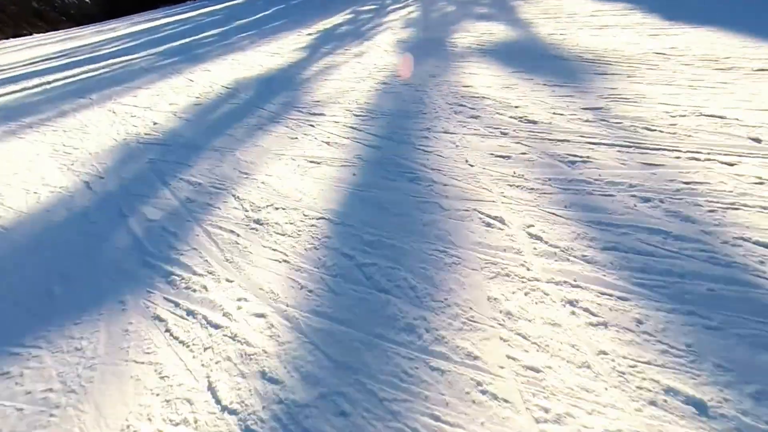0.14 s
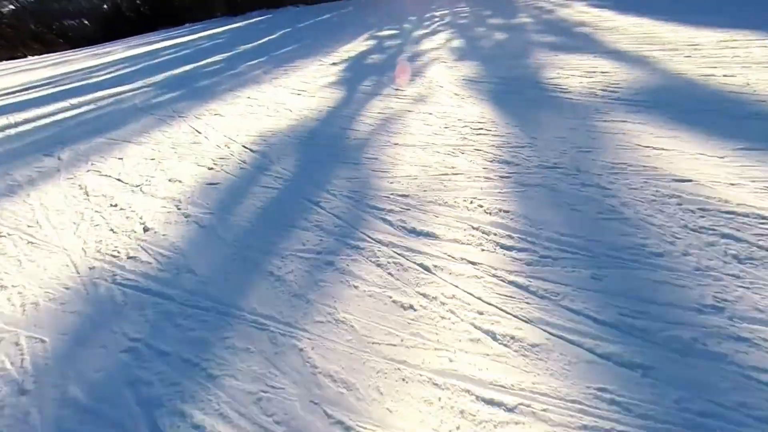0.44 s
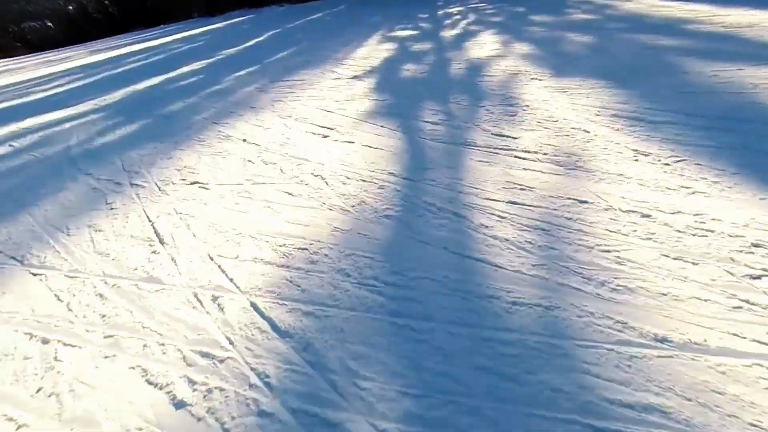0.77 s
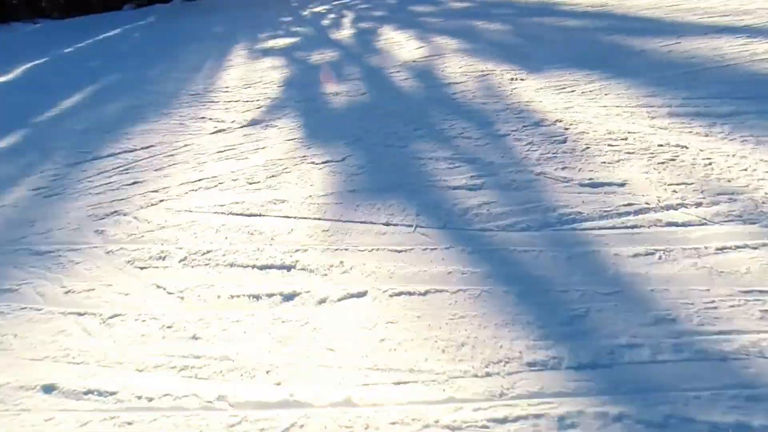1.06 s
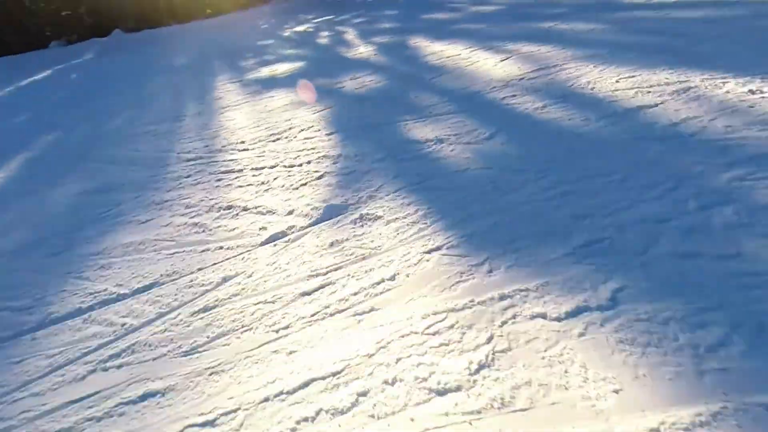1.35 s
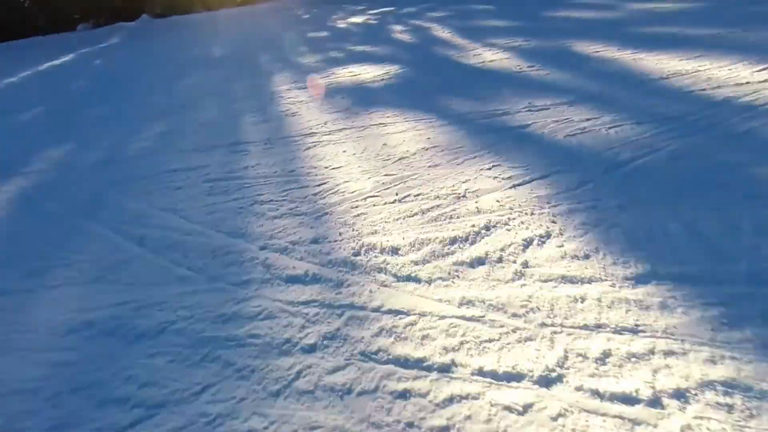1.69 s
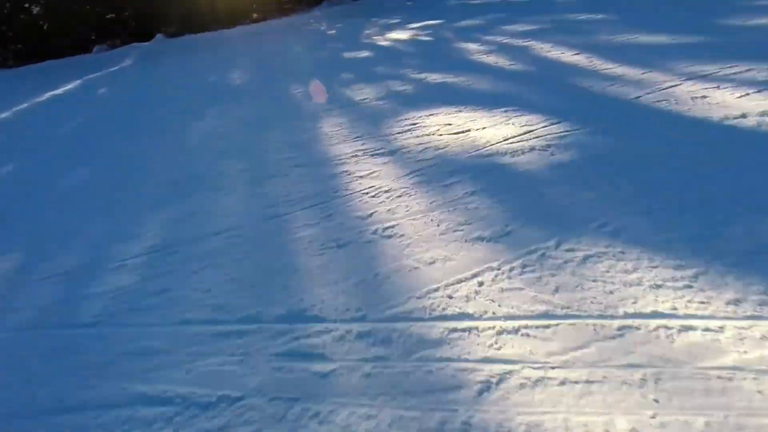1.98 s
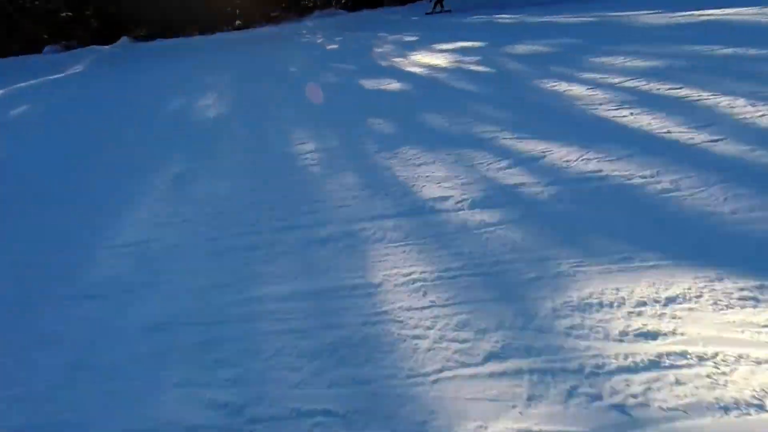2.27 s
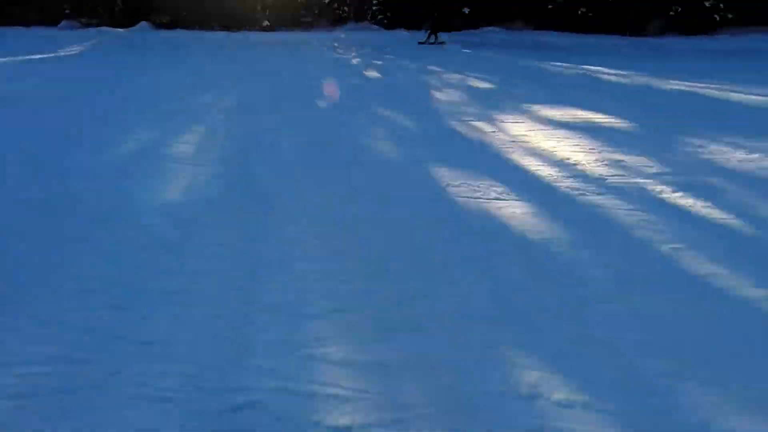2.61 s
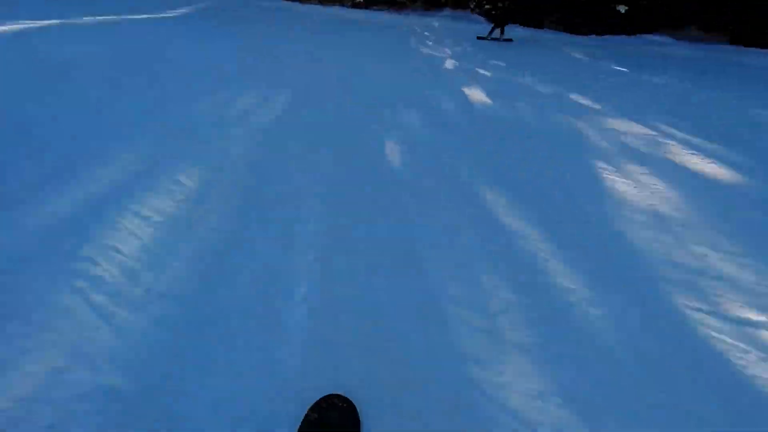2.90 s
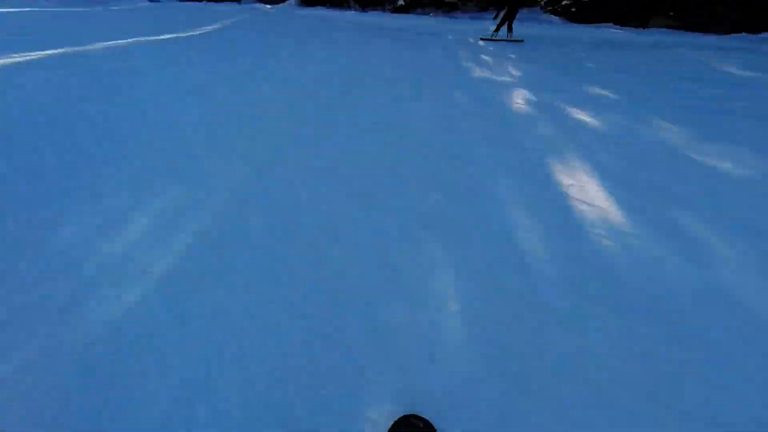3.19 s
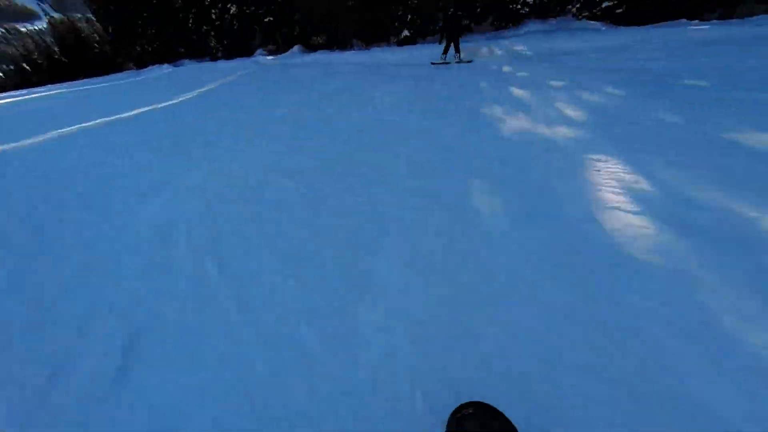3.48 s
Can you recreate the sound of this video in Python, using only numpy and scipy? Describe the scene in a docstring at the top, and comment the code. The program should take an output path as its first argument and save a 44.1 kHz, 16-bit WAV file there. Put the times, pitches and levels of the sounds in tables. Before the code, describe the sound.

A snowboard slides over packed snow with a steady hiss and low rumble, as wind buffets the rider's microphone. Small ticks hit the camera case, then the edge digs in and skids with one loud crack.

```python
"""A snowboard glides over packed snow, heard from a camera in a plastic case carried by the rider.
From the start the base hisses on the snow, the board rumbles and wind shakes the camera.
Soon small hard ticks, probably ice crumbs, ring the case near 2 kHz, and the board knocks on lumps.
Around 2 s the steel edge brushes the snow twice. Just after 3 s it digs in, and from 3.4 s it skids
to the end; early in the skid one tick is a loud crack."""
import sys
import numpy as np
from scipy import signal
from scipy.fft import rfft, irfft
from scipy.io import wavfile
from scipy.ndimage import uniform_filter1d

SR = 44100
rng = np.random.default_rng(int(sys.argv[2]) if len(sys.argv) > 2 else 0)


def transcribe(u):
    """Save the signal u as a 16-bit wav file named by the first command-line argument.

    u: samples, shape (n,) or (channels, n), limited to [-1, 1]; the rate is SR.
    q: integer samples, one column per channel.
    """
    v = np.clip(np.atleast_2d(u).T, -1, 1)
    q = np.round(v * 32767).astype(np.int16)
    wavfile.write(sys.argv[1], SR, q)


N = 160965
T = np.arange(N) / SR


def amp(db):
    """Turns decibels into a number to multiply by."""
    return 10 ** (np.asarray(db) / 20)


def unit(x):
    """Scales a signal to an average power of 1."""
    return x / np.sqrt(np.mean(x ** 2) + 1e-20)


def curve(rows, column=1):
    """Joins a table's points with straight lines, giving a value for every sample."""
    rows = np.array(rows)
    return np.interp(T, rows[:, 0], rows[:, column])


def spectrum(tone, hz):
    """Reads a tone table: how many dB at each frequency."""
    table_hz, db = np.transpose(tone)
    return np.interp(np.log(hz + 1), np.log(table_hz), db)


def add(mix, start_s, sound):
    """Mixes a sound in at its start time."""
    part = mix[round(start_s * SR):][:len(sound)]
    part += sound[:len(part)]


def noise(tone):
    """Steady noise shaped by a tone table."""
    gain = amp(spectrum(tone, np.fft.rfftfreq(N, 1 / SR)))
    return unit(irfft(rfft(rng.standard_normal(N)) * gain, N))


def uneven_snow(sound, patch_db, flicker_db):
    """Uneven snow makes a sound waver, in small patches of pitch and as a whole."""
    bands = signal.stft(sound, nperseg=256, noverlap=192)[2]
    patches = uniform_filter1d(rng.standard_normal(bands.shape), size=5, axis=0)
    patches = unit(uniform_filter1d(patches, size=24, axis=1))
    flicker = unit(uniform_filter1d(rng.standard_normal(bands.shape[1]), size=9))
    bands *= amp(patch_db * patches + flicker_db * flicker)
    return unit(signal.istft(bands, nperseg=256, noverlap=192)[1][:N])


# The tone of the plastic case when tapped (frequency [Hz], level [dB])
CASE_TONE = [(100, -24), (900, -27), (1200, -17), (1400, -18), (1520, -21), (1700, -3), (2000, 0),
             (2430, -1), (2700, -7.5), (3300, -13), (3700, -24), (5400, -26), (6400, -23), (6800, -15.5),
             (7600, -24), (8600, -21), (10000, -28), (11250, -19), (12600, -25), (13200, -34), (15200, -36)]
def case_ring(main_hz, treble_db, lag_s=.0004, lag_width_hz=1430):
    """A tap on the case: a snap, then a short ring whose pitch depends on where it is hit."""
    hz = np.fft.rfftfreq(4096, 1 / SR)
    shifted_hz = np.interp(hz, [0, main_hz, 11000, SR], [0, 2000, 11000, SR])
    db = spectrum(CASE_TONE, shifted_hz) + treble_db * np.maximum(hz - 3000, 0) / 9000
    log_gain = np.log(amp(np.r_[db, db[-2:0:-1]]))
    struck = np.exp(np.conj(signal.hilbert(log_gain)))[:len(hz)]  # starts sharply, then dies away
    lag = lag_s * np.exp(-((hz - main_hz) / lag_width_hz) ** 2)  # the ring comes after the snap
    wave = irfft(struck * np.exp(-2j * np.pi * np.cumsum(lag) * hz[1]))[:2048]
    return wave / abs(wave).max()


# The tone of the base sliding on snow (frequency [Hz], level [dB])
GLIDE_TONE = [(500, -24), (1000, -19.5), (1200, -14), (1450, -13.5), (1680, -3.5), (2000, 1), (2450, -3),
              (2650, -5.5), (2950, -7), (3150, -9), (3430, -10.5), (3800, -20), (4500, -23), (5030, -15),
              (5700, -24), (6900, -24), (7700, -26), (8500, -23), (9300, -29), (10300, -28.5),
              (11700, -35.5), (12300, -34.5), (13500, -43), (15200, -40)]
# How loud the glide's four ranges are, from low to high, before trim_db is added
# (time [s], hiss near 2 kHz [dB], rasp near 3 kHz [dB], sizzle near 5 kHz [dB], fine spray [dB])
GLIDE_LEVELS = [(0, -44, -52, -62.5, -67.5), (.12, -44.5, -49.5, -58.5, -66), (.4, -43.5, -51, -60.5, -68),
                (.6, -44.5, -51.5, -63, -71.5), (.79, -45.5, -51, -58, -67.5), (.9, -43, -50.5, -60, -66),
                (1.02, -45, -53, -59, -63), (1.1, -41.5, -47, -55.5, -60.5), (1.33, -42, -45, -54.5, -60),
                (1.48, -42, -50.5, -56.5, -63), (1.6, -46, -52, -57.5, -63),
                (1.76, -43.5, -47.5, -56.5, -62.5), (2.2, -44.5, -50, -56, -63.5),
                (2.48, -45.5, -52.5, -56.5, -65), (2.75, -41.5, -48, -56.5, -67.5),
                (2.88, -47.5, -53, -56, -67.5), (3.06, -47, -52.5, -57.5, -68),
                (3.3, -41, -43, -54.5, -64.5)]
# Where each range fades into the next (start [Hz], width [Hz])
RANGE_BORDERS = [(2250, 580), (3700, 300), (6000, 2040)]
def glide(trim_db, grains_per_s=400, grain_spread_db=2, grain_db=-10):
    """The base rubs over snow grains: a hiss with tiny clicks, swelling in four pitch ranges."""
    hits = (rng.random(N) < grains_per_s / SR) * rng.choice([-1, 1], N)
    strength = amp(grain_spread_db * np.minimum(rng.exponential(1, N), 4))
    grains = unit(signal.oaconvolve(hits * strength, case_ring(1950, treble_db=-10))[:N])
    rubbing = uneven_snow(noise(GLIDE_TONE), patch_db=1.14, flicker_db=0.98)
    whole = rfft(rubbing + amp(grain_db) * grains)
    hz = np.fft.rfftfreq(N, 1 / SR)
    above = [1] + [np.clip((hz - start) / width, 0, 1) for start, width in RANGE_BORDERS] + [0]
    out = np.zeros(N)
    for k in range(len(RANGE_BORDERS) + 1):
        band = unit(irfft(whole * (above[k] - above[k + 1]), N))
        out += band * amp(trim_db + curve(GLIDE_LEVELS, column=k + 1))
    return out


# The tone of the rumbling board (frequency [Hz], level [dB])
RUMBLE_TONE = [(25, -7), (60, -4.5), (78, -3.5), (115, 4), (160, -8), (220, -4), (320, -5), (420, -9.5),
               (520, -13), (670, -13.5), (850, -22), (1300, -23), (3000, -55)]
# How loud it rumbles (time [s], level [dB])
RUMBLE_LEVELS = [(0, -47.5), (.3, -49), (.58, -48.5), (.8, -49.5), (1.0, -47.5), (1.33, -47), (1.55, -48),
                 (1.8, -45.5), (2.1, -45.5), (2.39, -47), (2.67, -45), (3.05, -46), (3.27, -43.5),
                 (3.46, -40.5), (3.64, -47)]
# Dull knocks on lumps (time [s], level [dB], pitch [Hz], time to fade by 60 dB [s])
LUMP_KNOCKS = [(0.529, -36, 111, 0.079), (.905, -32.5, 80, .14), (1.314, -35, 327, 0.071),
               (1.351, -34, 84, 0.11), (2.685, -36.5, 284, 0.066), (2.859, -31.5, 109.4, 0.13),
               (3.2692, -21.5, 670, 0.024), (3.544, -22, 304, 0.047)]
def board():
    """The board rumbles over ridges in the snow and knocks on lumps."""
    out = uneven_snow(noise(RUMBLE_TONE), patch_db=1.0, flicker_db=1.07) * amp(curve(RUMBLE_LEVELS))
    t = np.arange(0, .2, 1 / SR)
    for start_s, db, hz, fade_s in LUMP_KNOCKS:
        rise = np.minimum(hz * t, 1)  # builds up over one cycle
        add(out, start_s, rise * amp(db - 60 * t / fade_s) * np.sin(2 * np.pi * hz * t))
    return out


# The tone of wind on the camera (frequency [Hz], level [dB])
WIND_TONE = [(10, -13), (24, -8), (35.5, -4), (42, -3.5), (50, -20), (80, -25), (200, -55), (600, -96)]
# How loud the gusts are, before trim_db is added (time [s], level [dB])
GUST_LEVELS = [(0.0, -35), (0.1, -34), (0.34, -45.5), (0.56, -34.5), (0.87, -59), (0.89, -40.5),
               (1.0, -43.5), (1.19, -31.5), (1.73, -38.5), (1.96, -35.5), (2.06, -44.5), (2.25, -34.5),
               (2.54, -38), (3.11, -36.5), (3.32, -26), (3.49, -35), (3.61, -25.5), (3.64, -30)]
def wind(trim_db, steadiness):
    """Gusts shake the camera with a deep flutter near 35 Hz, steadier than plain noise."""
    flutter = noise(WIND_TONE)
    swing = np.sqrt(uniform_filter1d(abs(signal.hilbert(flutter)) ** 2, size=3000))
    return unit(flutter / swing ** steadiness) * amp(trim_db + curve(GUST_LEVELS))


# Crumbs hitting the case (time [s], level [dB], ring pitch [Hz], treble change at 12 kHz [dB])
CRUMB_HITS = [(.2533, -34, 1940, -18), (.3287, -29.5, 2050, -23), (.5397, -32, 2260, -22),
              (.676, -33, 2040, -20), (1.4571, -32, 2000, -20), (1.6815, -21, 1930, -32),
              (1.7617, -27.5, 3370, -12), (1.9016, -32, 1970, -20), (3.2698, -22.5, 2500, -20),
              (3.2718, -21, 1910, -22), (3.3525, -19, 1930, -29), (3.3717, -45, 2920, -22),
              (3.4549, 0.5, 1996, -0.5), (3.4573, -13, 2420, -5), (3.4616, -27, 2000, 0),
              (3.4706, -20, 1970, -31), (3.5159, -32, 1830, -18)]
def crumb_ticks(fizz_db=-18.5, fizz_fade_s=0.028, fizz_treble_db=-8):
    """Each crumb rings the case once and breaks up in a brief, duller fizz."""
    out, t = np.zeros(N), np.arange(2048) / SR
    for start_s, db, hz, treble_db in CRUMB_HITS:
        crumble = rng.standard_normal(len(t)) * amp(-60 * t / fizz_fade_s)
        dull_ring = case_ring(hz, treble_db + fizz_treble_db)
        fizz = signal.fftconvolve(crumble, dull_ring)[:len(t)] / np.linalg.norm(dull_ring)
        add(out, start_s, amp(db) * (case_ring(hz, treble_db) + amp(fizz_db) * fizz))
    return out


# The tone of the edge brushing the snow (frequency [Hz], level [dB])
BRUSH_TONE = [(1200, -35), (2300, 0), (2900, -2), (3400, 9), (3800, -21), (5000, -16), (6000, -33),
              (12000, -44)]
# Each brush (time [s], length [s], level [dB])
EDGE_BRUSHES = [(1.847, 0.15, -45.5), (2.2, 0.085, -49)]
def edge_brushes():
    """The steel edge touches the snow in short swishes that swell and fade."""
    swish = noise(BRUSH_TONE)
    return sum(swish * amp(db) * np.sin(np.pi * np.clip((T - start_s) / length_s, 0, 1))
               for start_s, length_s, db in EDGE_BRUSHES)


def scrape(tone, levels):
    """The edge rubs on uneven snow, silent until the first time in its level table."""
    rubbing = uneven_snow(noise(tone), patch_db=1.3, flicker_db=1.1)
    return rubbing * amp(curve(levels)) * (T > levels[0][0])


# The tone of the edge digging in (frequency [Hz], level [dB])
BITE_TONE = [(300, -4), (700, -14.5), (1000, -41), (1500, -15), (2000, 2.5), (2450, 5), (3000, 0.5),
             (3500, -17), (4100, -28), (5100, -4.5), (5650, -11), (6550, -5), (7300, -37), (9300, -47),
             (11200, -30), (13500, -52)]
# How loud it digs (time [s], level [dB])
BITE_LEVELS = [(3.02, -78), (3.09, -43.5), (3.18, -48.5), (3.21, -37.5), (3.33, -41.5), (3.42, -45.5),
               (3.48, -60)]
def edge_bite():
    """The edge digs into the snow with a sizzle."""
    return scrape(BITE_TONE, BITE_LEVELS)


# The tone of the skid (frequency [Hz], level [dB])
SKID_TONE = [(300, -12), (1000, -20), (1400, -32), (1850, 0), (2300, -28), (2750, 1), (3150, -12),
             (3480, -3), (4150, -25), (5000, -10), (5600, -16), (6600, -31), (7150, -22), (7800, -29),
             (11200, -37), (13300, -43), (15100, -37)]
# How loud the skid is (time [s], level [dB])
SKID_LEVELS = [(3.40, -53), (3.43, -40), (3.47, -42), (3.50, -42), (3.55, -38.5), (3.60, -36), (3.65, -37)]
def edge_skid():
    """The edge slips sideways and scrapes across the snow."""
    return scrape(SKID_TONE, SKID_LEVELS)


def scene():
    """Adds all the sounds together in one channel."""
    ride = glide(trim_db=-0.4) + board() + wind(trim_db=-0.97, steadiness=0.78)
    return (ride + crumb_ticks() + edge_brushes() + edge_bite() + edge_skid())[None]


def record(dry):
    """Cuts away the very highest treble."""
    low_pass = signal.firwin(511, cutoff=15350, window=("kaiser", 9), fs=SR)
    return signal.oaconvolve(dry, low_pass[None], "same")


dry = scene()
out = record(dry)
transcribe(out)
```